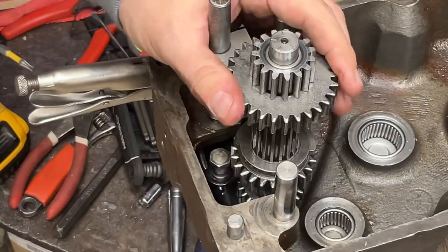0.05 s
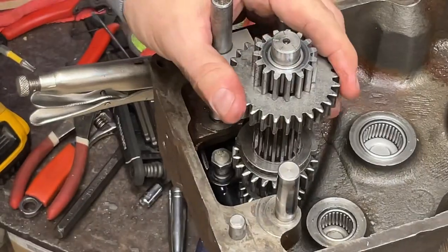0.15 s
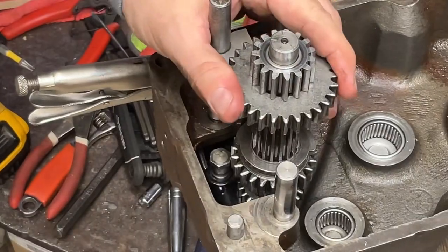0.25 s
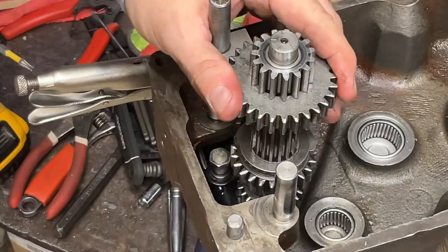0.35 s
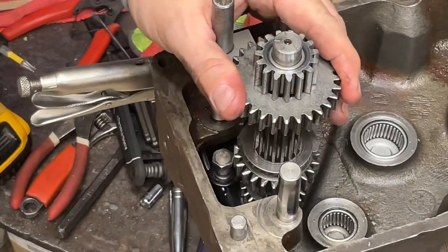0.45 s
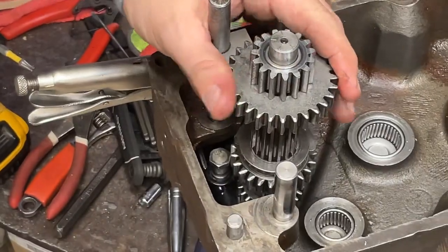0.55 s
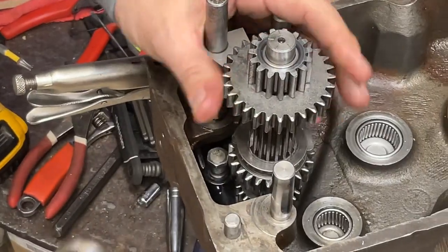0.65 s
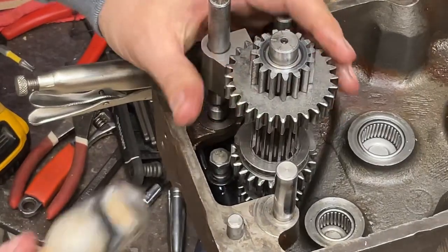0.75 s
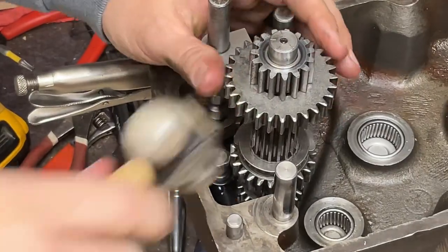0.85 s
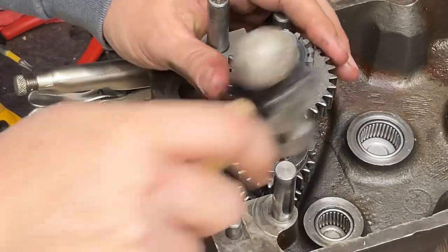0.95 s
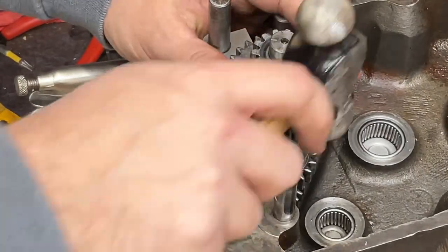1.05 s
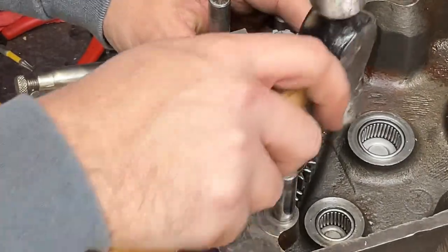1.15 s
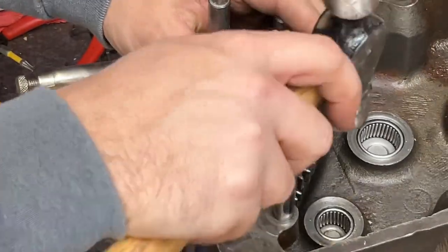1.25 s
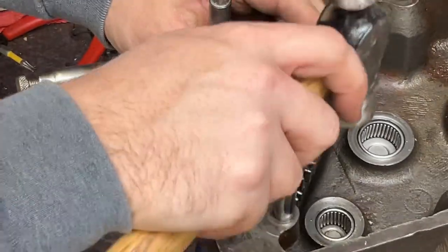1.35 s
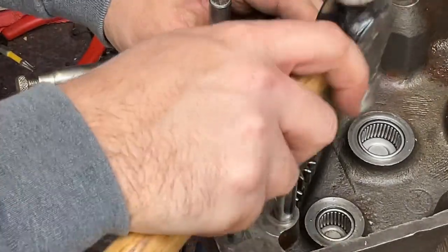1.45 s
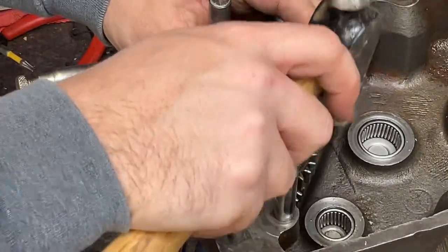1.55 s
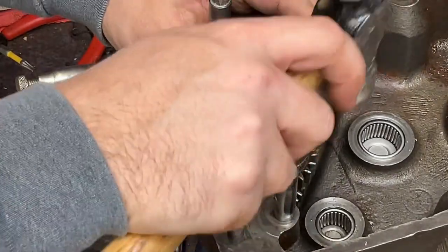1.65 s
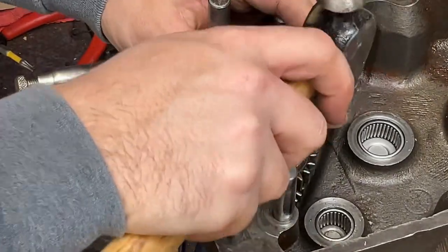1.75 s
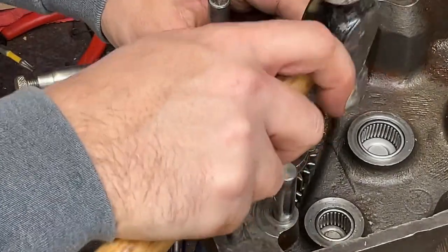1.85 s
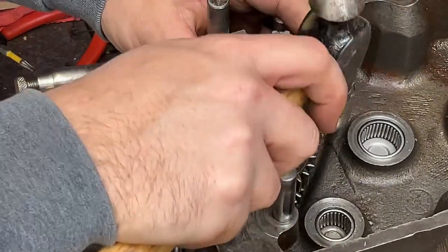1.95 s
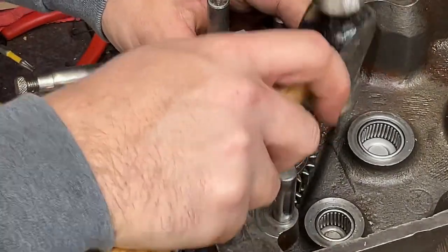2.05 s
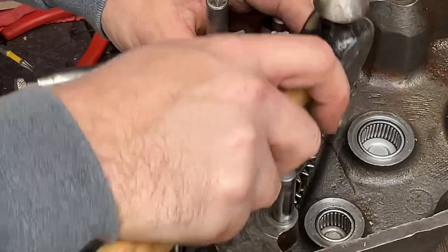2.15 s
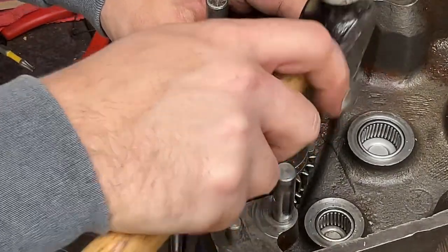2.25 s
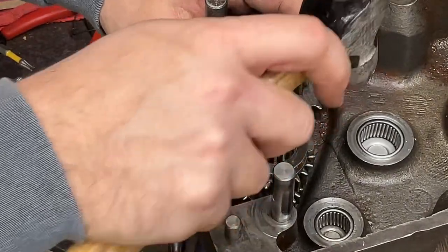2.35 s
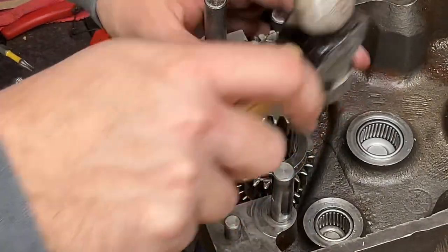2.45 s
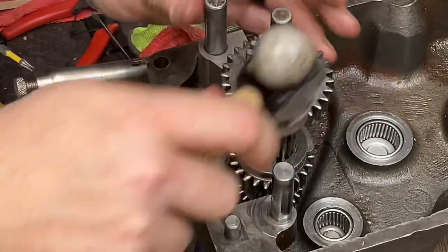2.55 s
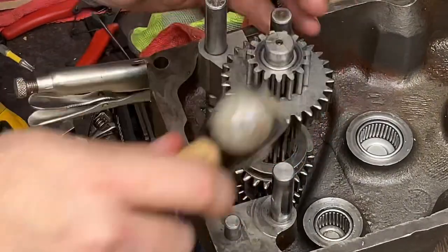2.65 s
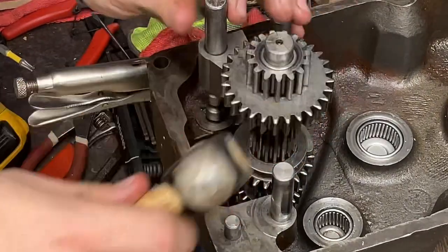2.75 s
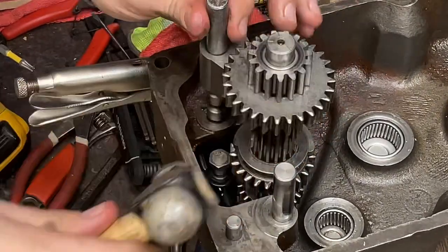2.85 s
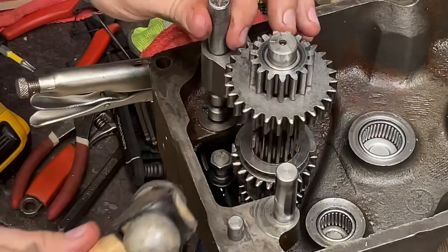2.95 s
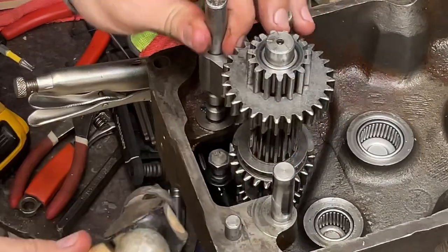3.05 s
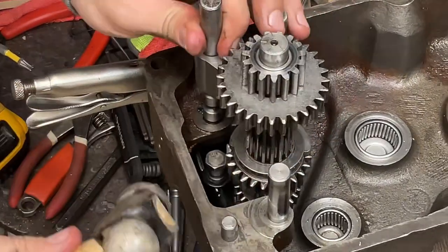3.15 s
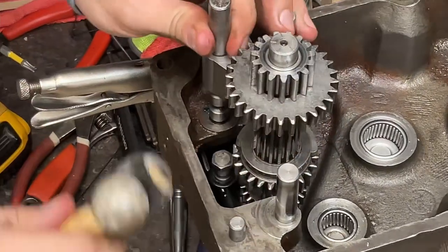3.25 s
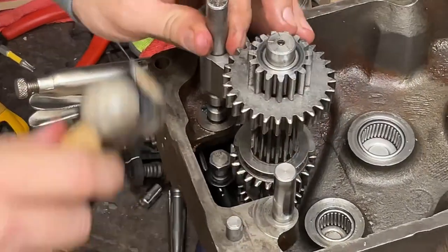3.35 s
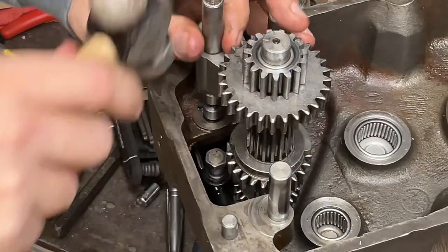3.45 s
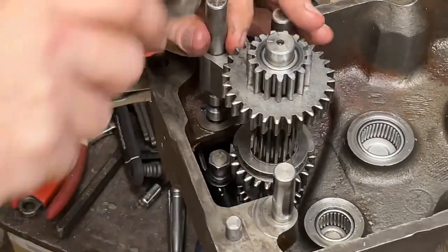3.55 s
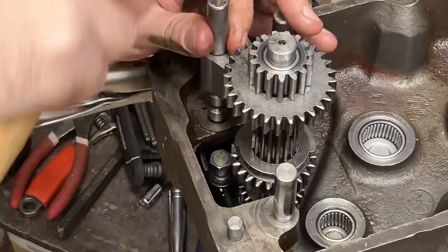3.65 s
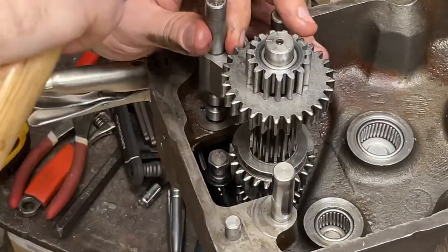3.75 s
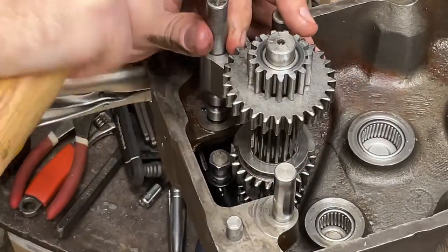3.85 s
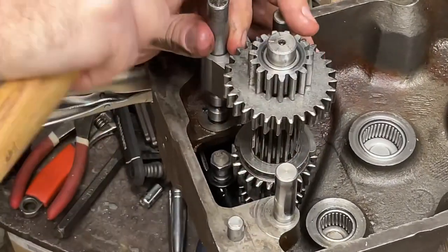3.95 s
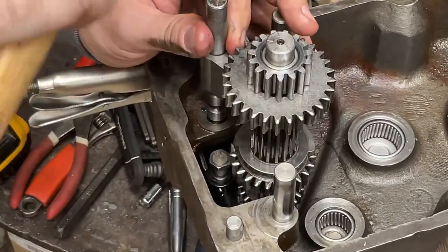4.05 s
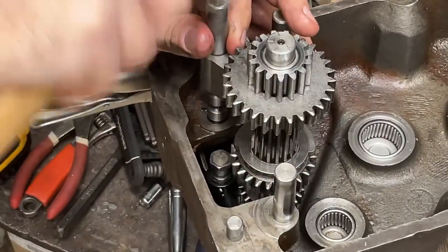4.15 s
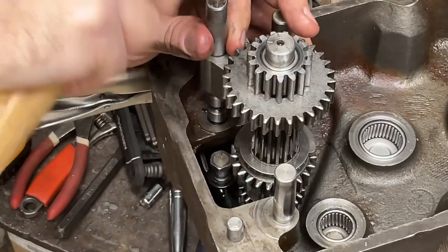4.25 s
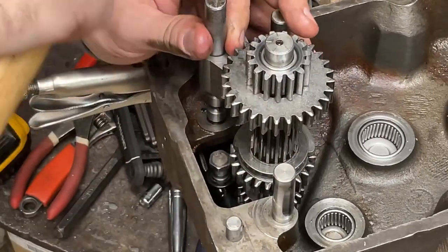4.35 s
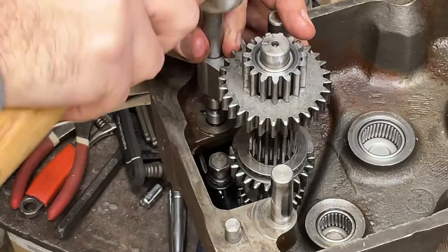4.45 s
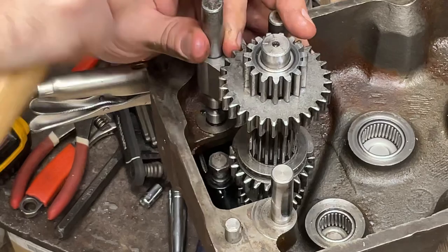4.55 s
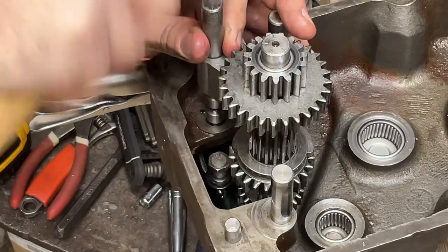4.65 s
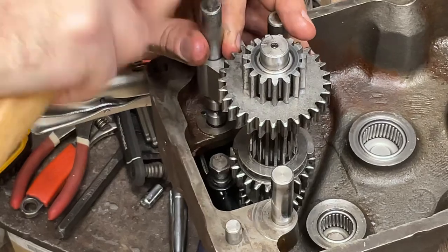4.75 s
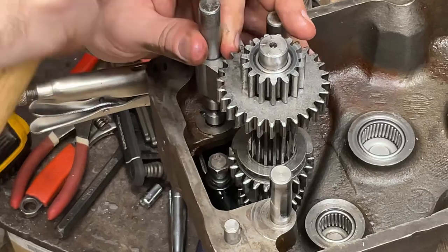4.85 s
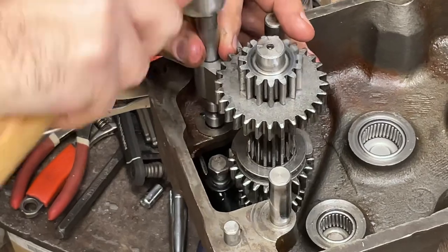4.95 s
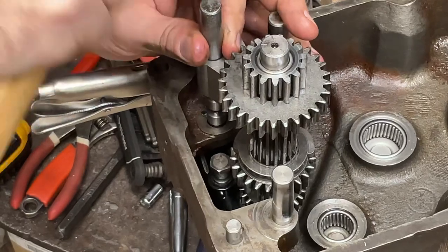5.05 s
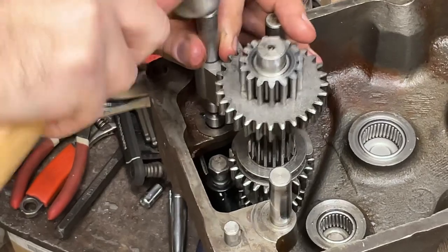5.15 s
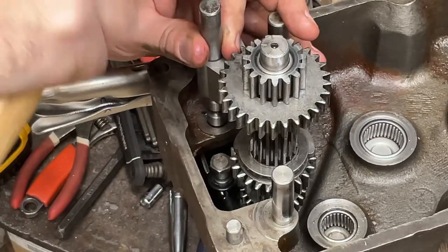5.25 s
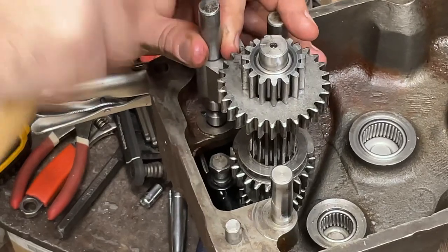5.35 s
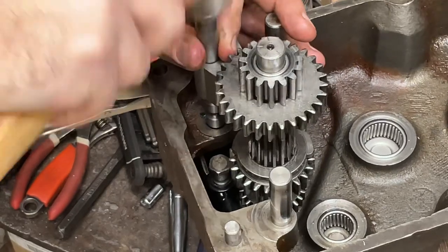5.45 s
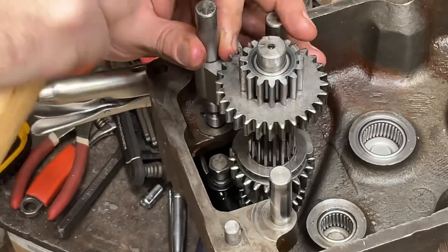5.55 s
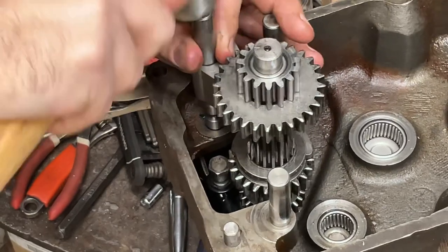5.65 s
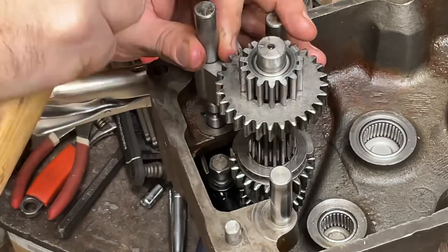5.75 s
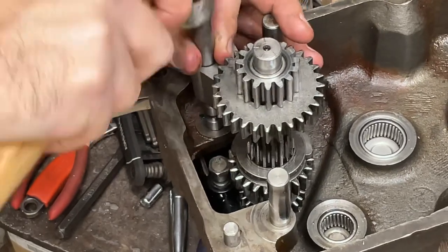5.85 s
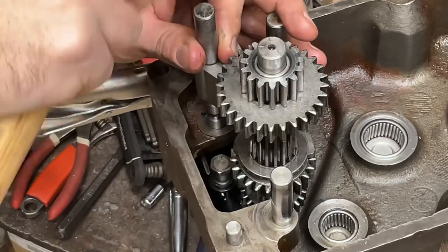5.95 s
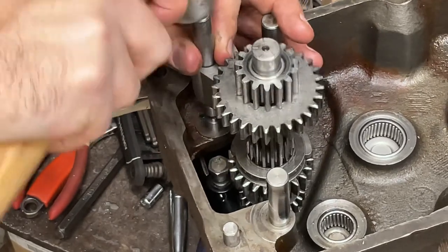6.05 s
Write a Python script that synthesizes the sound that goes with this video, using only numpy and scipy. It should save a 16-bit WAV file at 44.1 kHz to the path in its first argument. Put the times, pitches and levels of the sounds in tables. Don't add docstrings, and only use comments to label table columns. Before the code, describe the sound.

Low hum and dull ventilation, with faint hand bumps. After about a second come five short metallic taps, roughly four or five per second. A pause follows with soft cloth rubs, a low bump and a faint creak. Then regular hard steel blows run to the end, each a dry crack with short clanking rattle and high ring, heard close on a phone with slightly hollow, squashed tone.

```python
import sys
import numpy as np
from scipy import signal
from scipy.fft import rfft, irfft, next_fast_len
from scipy.io import wavfile
from scipy.ndimage import uniform_filter1d

SR = 44100
rng = np.random.default_rng(int(sys.argv[2]) if len(sys.argv) > 2 else 0)


def dump_mix(stems):
    frames = np.atleast_2d(stems).T
    limited = np.clip(frames, -1, 1)
    pcm = np.round(limited * 32767).astype(np.int16)
    wavfile.write(sys.argv[1], SR, pcm)


def ratio(d):
    e = np.asarray(d, float) / 20
    return 10 ** e


N = 268569

# (frequency [Hz], level [dB])
AIR_COLOUR = [(60, -34.5), (100, -3), (150, 3), (250, 0), (450, -0.5), (880, -6), (1300, -8.5), (2300, -18),
              (3600, -21.5), (5000, -32.5), (7000, -42.5), (12000, -46.5), (16000, -75.5)]
# (frequency [Hz], level [dB])
LAMP_HUM = [(120, -0.5), (250, -14)]
# (time [s], share of full cut [0-1])
DUCK = [
    (3.45, 0),
    (3.62, 0.31),
    (3.85, 0.8),
    (4.2, 0.82),
    (6.09, 1),
]
# (time [s], rumble level [dB], length [s])
BUMPS = [(0.0, -52, 0.033), (0.26, -59, 0.091), (0.61, -64, .15), (0.82, -63, 0.18), (1.2, -59, 0.18),
         (1.513, -56, 0.079), (1.936, -52.5, 0.23), (2.14, -50, 0.091), (2.287, -64, 0.085),
         (2.494, -54, 0.17), (2.719, -56.5, 0.13), (2.834, -55.5, 0.25), (3.113, -53, 0.11),
         (3.228, -44.5, 0.18), (3.311, -40.5, 0.078), (3.459, -55, .25), (0.117, -60, .1), (1.012, -62, .1)]
# (time [s], peak [dB], centre [Hz], width [octaves], t60 [s])
TOUCHES = [
    (0, -77, 3970, .8, 0.43),
    (.63, -56.5, 600, 1.16, 0.44),
    (1.918, -48, 1812, .8, 0.056),
    (2.3, -74.5, 5550, 0.26, 2.6),
    (3.445, -55.5, 694, 1.34, 0.4),
    (3.478, -77.5, 7930, 0.85, 0.06),
    (3.815, -59, 590, 1, 0.27),
]
# (time [s], peak [dB], case knock [dB], face ring [dB], favoured resonance [Hz])
GEAR_TAPS = [
    (1.2615, -32, 5.5, -88, 2260),
    (1.509, -16, 2, -46.5, 2700),
    (1.7133, -13, -2, -50.5, 5600),
    (1.9243, -13, -0.5, -51.5, 4770),
    (2.1065, -16.5, -0.5, -59, 4570),
]
RAIL_BLOWS = [
    (3.9137, -7.5, -4, -65, 3750),
    (4.192, -5, 0, -45.5, 2110),
    (4.4465, -5, 1.5, -34, 1120),
    (4.6945, -5, 2, -24, 598),
    (4.9353, -5, 3.5, -22, 1830),
    (5.172, -5.5, 1, -20.5, 480),
    (5.4023, -6, -0.5, -21, 454),
    (5.6247, -6, 0, -14, 2190),
    (5.8415, -6.5, -9, -16.5, 2620),
    (6.0503, -5.5, -2, -18, 2720),
]
# (frequency [Hz], width [Hz], level [dB])
GEAR_MODES = [(378, 32, 4), (1380, 55, -2.5), (2115, 37, -1), (2080, 65, 4.5), (2366, 35, 5),
              (2700, 35.5, -15), (3200, 18, 1), (3684, 42, 2.5), (3440, 60, 0), (4050, 56, -5),
              (4540, 40, -3.5), (4240, 100.5, -4.5), (4744, 79, 2), (5440, 67, -2.5), (6190, 56.7, -17),
              (6460, 260, 1), (8150, 140, 2.5), (12770, 430, 2)]
RAIL_MODES = [(445.4, 23, -1.5), (583, 16, 0.5), (659, 35, 0), (770, 31, -4.5), (843, 11, 6.5),
              (820, 24, -11), (913, 19, 3), (1050.4, 43, 9), (1504, 71, -3), (1828, 33, -0.5),
              (1880, 96, 3.5), (2275, 140, -2), (2626, 80, 0), (3537, 210, -1.5), (3720, 110, -4),
              (4520, 71, 2), (4640, 69, 0.5), (5290, 59, 2), (5650, 52, 3.5), (6470, 22, -17.5),
              (6620, 75, 5), (6400, 22, -3.5), (7810, 23, 2.5), (8680, 260, -1.5)]
# (frequency [Hz], level [dB], t60 [s])
GEAR_HEAD = [(10470, 0, .24), (11940, 0, .12), (12020, -6, .09), (14130, 0, .2)]
RAIL_HEAD = [(10460, 0, .26), (12350, 0, .06), (12325, -33, .3), (12350, -36, .3), (15350, -10, .03),
             (14112, -34, .36), (14150, -23, .13), (14050, 0, .03), (14230, -3, .045)]
# (frequency [Hz], level [dB])
GEAR_CRACK = [(35, -73), (60, -50.5), (580, -5.5), (1200, -11.5), (2300, 0.5), (3600, 5.5), (5500, -3),
              (8400, -28), (13000, -8), (15500, -35), (17000, -52)]
GEAR_RATTLE = [(24, -35), (50, -21), (130, -16), (360, -7), (800, -5), (1500, -10), (2400, -7),
               (3700, -4.5), (5500, -18), (7200, -24), (10000, -26), (13200, -16), (14500, -46.5),
               (17000, -77.5)]
RAIL_CRACK = [(35, -33.5), (80, -12.5), (600, 4.5), (1300, -5.5), (2600, 0.5), (4400, -4.5), (6500, -9),
              (10000, -15), (14000, -9), (15800, -24), (17000, -55.5)]
RAIL_RATTLE = [(24, -30), (50, -15), (120, -8), (300, -5.5), (600, -1.5), (1300, -6), (2500, -6),
               (3600, -9), (5500, -14.5), (7500, -19.5), (11000, -19.5), (14200, -15.5), (15700, -27.5),
               (17000, -96.5)]
# (frequency [Hz], t60 [s])
GEAR_T60 = [(40, 0.25), (300, 0.19), (1500, 0.18), (4000, 0.2), (8000, 0.19), (16000, 0.12)]
RAIL_T60 = [(40, 0.24), (300, 0.18), (800, 0.21), (2000, 0.22), (4000, 0.21), (8000, 0.17), (16000, 0.16)]
# (crack [dB], crack t60 [s], resonance [dB], rattle [dB], rattle hold [s],
# repeated share [0-1], room [dB], room t60 [s])
GEAR_MIX = (-8, 0.0188, 7.5, -19.5, 0, 0.76, -51.5, 0.96)
RAIL_MIX = (-8, 0.0411, 6, -20.5, 0.0365, 0.5, -42.5, 0.3745)
# (face ring [dB], brightness [dB/octave], length ring [dB], side ring [dB], favoured lift [dB])
GEAR_SQUARE = (-39.5, 0.7, -46.5, -59, 2.5)
RAIL_SQUARE = (-41, -0.97, -68.5, -21, 3)
# (brightness [dB/octave], length ring [dB], side ring [dB], favoured lift [dB])
GEAR_GLANCE = (-0.078, -1.05, -0.62, 0.078)
RAIL_GLANCE = (-0.084, 0.92, -1.9, 0.26)
# (frequency [Hz], level [dB], t60 [s])
BENCH_THUD = [(44.5, -2.5, 0.098), (76, -2.5, 0.16), (129, 1, 0.16), (222, 0, 0.12), (329.1, 3, 0.092)]

AIR_DB, HUM_DB, RUMBLE_DB = -61, -52, -72
AIR_CUT_DB, HUM_CUT_DB = -8, -23.5
BUMP_RISE, BUMP_DROP_DB = 0.16, -17.5
GROAN_S, GROAN_LENGTH_S, GROAN_DB, GROAN_ATTACK_S, GROAN_RELEASE_S = 3.47, 0.33, -61, 0.12, 0.075
TOUCH_RISE = 0.04
THUD_DB, THUD_PER_BRIGHT, THUD_RISE_S = -33.5, 2.5, 0.004
GRIP_T60_S, FLUTTER_DB = 0.83, 5
TICK_DB, TICK_HZ, TICK_TOP_HZ, TICK_T60_S = -16.5, 9350, 15100, 0.0074
PING_DB, PING_T60_S = -26.5, 0.043
DULL_HZ, DULL_DB = 10900, -4
RATTLE_TOP_HZ, TOP_HZ_PER_DB = 14550, 61
NOTCH_HZ, NOTCH_SHIFT_HZ, NOTCH_TOP_HZ = 1022, 20, 10700


def colour(table, hz):
    f, db = np.transpose(table)
    return ratio(np.interp(np.log(hz + 1), np.log(f), db))


def shaped(x, gain):
    y = irfft(rfft(x) * gain, len(x))
    return y / np.sqrt(np.mean(y ** 2))


def fade(t, t60):
    return ratio(-60 * t / t60)


def rise(t, rise_s):
    return 1 - np.exp(-t / rise_s)


def walk(rate_hz):
    k = int(SR / rate_hz)
    steps = np.repeat(rng.standard_normal(N // k + 1), k)
    return uniform_filter1d(uniform_filter1d(steps, k), k)[:N]


def shop():
    t, hz = np.arange(N) / SR, np.fft.rfftfreq(N, 1 / SR)
    duck = np.interp(t, *np.transpose(DUCK))
    air_db = AIR_DB + AIR_CUT_DB * duck + 0.65 * walk(3.8)
    air = shaped(rng.standard_normal(N), colour(AIR_COLOUR, hz)) * ratio(air_db)
    hum = 0
    for k, (f, db) in enumerate(LAMP_HUM):
        hum = hum + ratio(db + 4.9 * k * walk(36)) * np.sin(2 * np.pi * f * t)
    hum = hum * ratio(HUM_DB + HUM_CUT_DB * duck)
    rumble = shaped(rng.standard_normal(N), hz / (hz + 12) / (1 + (hz / 80) ** 2.0))
    rumble_level = ratio(RUMBLE_DB)
    for s, db, length_s in BUMPS:
        away_s = np.maximum(t - s, (s - t) / BUMP_RISE)
        rumble_level = rumble_level + ratio(db + BUMP_DROP_DB * away_s / length_s)
    groan = shaped(rng.standard_normal(N), 1 / (1 + ((hz - 183) / 9) ** 2))
    before = (GROAN_S - t) / GROAN_ATTACK_S
    after = (t - GROAN_S - GROAN_LENGTH_S) / GROAN_RELEASE_S
    lean = ratio(GROAN_DB - 20 * np.maximum(np.maximum(before, after), 0))
    return air + hum + rumble * rumble_level + groan * lean


def touches():
    size = 2 ** 15
    t, hz, out = np.arange(size) / SR, np.fft.rfftfreq(size, 1 / SR), np.zeros(N)
    for s, db, centre_hz, width_oct, t60 in TOUCHES:
        band = np.exp(-(np.log2((hz + 1) / centre_hz) / width_oct) ** 2)
        puff = shaped(rng.standard_normal(size), band)
        shape = fade(t, t60) * rise(t, TOUCH_RISE * t60 ** 2) * np.cos(np.pi / 2 * t / t[-1])
        out[int(s * SR):][:size] += ratio(db) * puff * shape
    return out


def resonances(modes, hz, lift_db):
    f, width, db = np.transpose(modes)[:, :, None]
    peaks = ratio(db + lift_db) ** 2 / (1 + (2 * (hz - f) / width) ** 2)
    return np.sqrt(1 + peaks.sum(axis=0))


def strike_tilt(hz, bright_db, knock_db, spot_db, spot_hz):
    bright = bright_db * np.log2(np.clip(hz, 1500, 16000) / 3000)
    knock = knock_db / (1 + (np.log2((hz + 1) / 760) / 0.59) ** 4)
    spot = spot_db / (1 + ((hz - spot_hz) / (0.077 * spot_hz)) ** 2)
    dull = DULL_DB * max(-bright_db, 0) / (1 + (DULL_HZ / (hz + 1)) ** 10)
    return ratio(bright + knock + spot + dull)


def steel_tick(noise, t, hz):
    band = 1 / (1 + (TICK_HZ / (hz + 1)) ** 4) / (1 + (hz / TICK_TOP_HZ) ** 12)
    return shaped(noise, band) * fade(t, TICK_T60_S)


def spot_ping(spot_hz, t):
    return fade(t, PING_T60_S) * np.sin(2 * np.pi * spot_hz * t) * rise(t, 0.0006)


def bench_thud(t):
    f, db, t60 = np.transpose(BENCH_THUD)[:, :, None]
    modes = ratio(db) * fade(t, t60) * np.sin(2 * np.pi * f * t)
    return modes.sum(axis=0) * rise(t, THUD_RISE_S)


def rattle(noise, gain, t, hz, hold_s, decay, room_db, room_t60):
    spectrum, out = rfft(shaped(noise, gain)), 0
    f, t60 = np.transpose(decay)
    late = np.sqrt(t ** 2 + hold_s ** 2) - hold_s
    for centre in 30 * 2 ** np.arange(0, 9.6, .5):
        band = np.clip(1 - 2 * abs(np.log2((hz + 1) / centre)), 0, 1)
        band_t60 = np.interp(np.log(centre), np.log(f), t60)
        room = ratio(room_db) * fade(t, room_t60 * band_t60 / 0.17)
        out = out + irfft(spectrum * band, len(t)) * (fade(late, band_t60) + room)
    return out * rise(t, 0.00025)


def head_ring(modes, t, scatter_db=0.):
    hz, db, t60 = np.transpose(modes)[:, :, None]
    chance = rng.standard_normal((2, len(modes), 1))
    hz = hz * (1 + .0012 * chance[0])
    rings = ratio(db + scatter_db * chance[1]) * fade(t, t60) * np.sin(2 * np.pi * hz * t)
    return rings.sum(axis=0)


def blows(table, square, glance, modes, head, crack, tail, decay, mix, side_rings):
    crack_db, crack_t60, lift_db, rattle_db, hold_s, share, room_db, room_t60 = mix
    size = 2 ** 14
    t, hz, out = np.arange(size) / SR, np.fft.rfftfreq(size, 1 / SR), np.zeros(N + size)
    same, body = rng.standard_normal((2, size)), resonances(modes, hz, lift_db)
    for s, peak_db, knock_db, face_db, spot_hz in table:
        short_db = square[0] - face_db
        bright_db = square[1] + glance[0] * short_db
        length_db, side_db, spot_db = np.add(square[2:], np.multiply(glance[1:], max(short_db, 0)))
        top_hz = RATTLE_TOP_HZ + TOP_HZ_PER_DB * max(-short_db, 0)
        tilt = body * strike_tilt(hz, bright_db, knock_db, spot_db, spot_hz)

        noise = np.sqrt(share) * same + np.sqrt(1 - share) * rng.standard_normal((2, size))
        snap = shaped(noise[0], colour(crack, hz) * tilt / (1 + (hz / top_hz) ** 30))
        snap = snap * fade(t, crack_t60) * rise(t, 0.00023)
        tick = ratio(TICK_DB + 2 * bright_db) * steel_tick(noise[0], t, hz)
        ping = ratio(PING_DB + 0.9 * spot_db) * spot_ping(spot_hz, t)
        thud = ratio(THUD_DB + THUD_PER_BRIGHT * bright_db) * bench_thud(t)

        shake = rng.standard_normal(size)
        bounce = ratio(1.34 * uniform_filter1d(shake, size=160) * np.sqrt(160))
        flutter = uniform_filter1d(uniform_filter1d(shake, size=500), size=200) * np.sqrt(500)
        grip = ratio(FLUTTER_DB * flutter) * fade(t, GRIP_T60_S)
        gain = colour(tail, hz) * tilt / (1 + (hz / top_hz) ** 60)
        loose = bounce * rattle(noise[1], gain, t, hz, hold_s, decay, room_db - rattle_db, room_t60)

        length = ratio(length_db) * head_ring(head[:1], t)
        face = ratio(face_db + 1.5) * head_ring(head[1:-side_rings], t, scatter_db=6.5)
        side = ratio(side_db) * head_ring(head[-side_rings:], t, scatter_db=3.5)

        hit = ratio(crack_db) * snap + ratio(rattle_db) * loose + tick + ping + thud
        i = int((s + .002) * SR)
        out[i:i + size] += ratio(peak_db + 4.5) * hit + (face + side) * grip + length
    return out[:N]


def scene():
    background = shop() + touches()
    gear = blows(GEAR_TAPS, GEAR_SQUARE, GEAR_GLANCE, GEAR_MODES, GEAR_HEAD,
                 GEAR_CRACK, GEAR_RATTLE, GEAR_T60, GEAR_MIX, side_rings=1)
    rail = blows(RAIL_BLOWS, RAIL_SQUARE, RAIL_GLANCE, RAIL_MODES, RAIL_HEAD,
                 RAIL_CRACK, RAIL_RATTLE, RAIL_T60, RAIL_MIX, side_rings=4)
    return (background + gear + rail)[None]


def low_pass(x):
    return signal.sosfilt(signal.butter(12, 17140, fs=SR, output="sos"), x)


def record(dry):
    size = next_fast_len(N + SR)
    hz = np.fft.rfftfreq(size, 1 / SR)
    turn = np.exp(-2j * np.pi * (hz + NOTCH_SHIFT_HZ) / NOTCH_HZ)
    comb = .8 * (1 - .95 * turn) / (1 - .55 * turn)
    inside = 1 / (1 + (600 / (hz + 1)) ** 8) / (1 + (hz / NOTCH_TOP_HZ) ** 14)
    rounded = np.tanh(1.3 * dry) / 1.3
    top_cut = signal.ellip(6, .5, 45, 15900, fs=SR, output="sos")
    limited = signal.sosfilt(top_cut, rounded)
    mix = irfft(rfft(limited, size) * (1 + inside * (comb - 1)), size)[:, :N]
    return low_pass(mix)


dry = scene()
out = record(dry)
dump_mix(out)
```